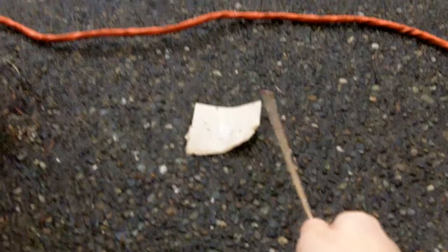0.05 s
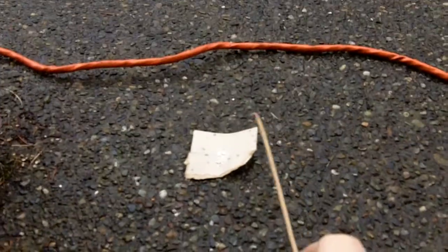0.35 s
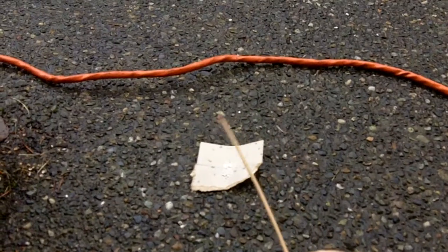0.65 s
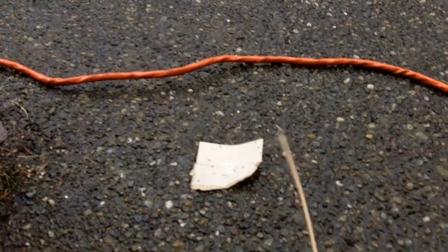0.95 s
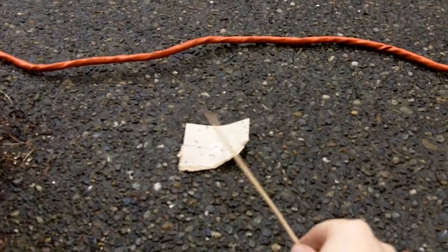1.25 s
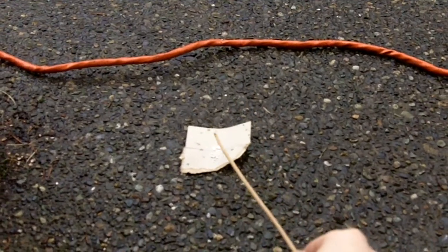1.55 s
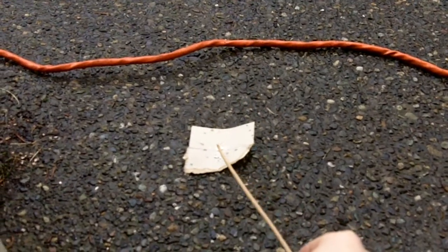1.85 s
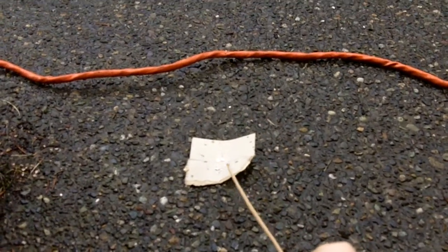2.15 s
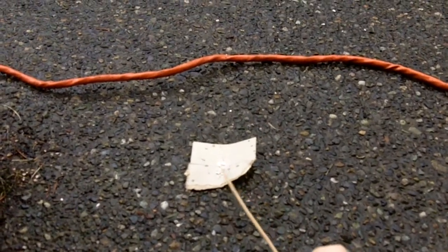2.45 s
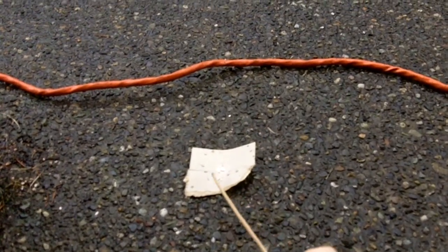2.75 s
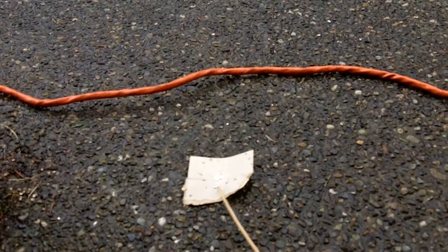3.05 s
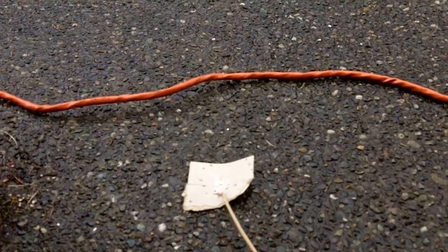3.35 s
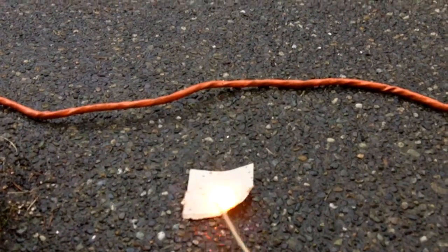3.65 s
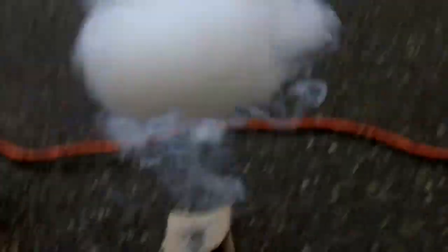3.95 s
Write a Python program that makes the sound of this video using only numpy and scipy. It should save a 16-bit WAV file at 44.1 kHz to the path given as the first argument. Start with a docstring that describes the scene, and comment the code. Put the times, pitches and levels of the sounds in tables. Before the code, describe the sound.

Flash powder ignites close by in one short, fizzing, roaring whoosh at about 3.7 seconds, gone by 3.9. From the start, a distant machine hums and buzzes steadily over outdoor air. Faint dry ticks fall between 0.6 and 3.1 seconds, with a soft low billow near 2.9. Tiny sizzles come around 3.4 and 3.6 seconds as grains catch. After the flare, the background hum is quieter.

```python
"""A machine hums and buzzes some way off, throbbing with its shaft over a wash of outdoor air.
Close by, a smouldering stick is put to a pinch of flash powder on a paper square on asphalt.
Faint dry ticks, a soft low billow, two small sizzles as grains catch; then the heap goes up in
one short whoosh of fizzing grains and roaring fireball. The mono microphone has a narrow notch,
and its gain control ducks the background after the flash."""
import sys
import numpy as np
from scipy import signal
from scipy.fft import rfft, irfft
from scipy.io import wavfile
from scipy.ndimage import uniform_filter1d

SR = 44100
rng = np.random.default_rng(int(sys.argv[2]) if len(sys.argv) > 2 else 0)


def materialize(psi):
    """Save the field psi as 16-bit PCM at rate SR to the path in sys.argv[1].

    A 1-D psi becomes a single channel; in a 2-D psi each row is a channel.
    """
    bounded = np.clip(np.atleast_2d(psi).T, -1, 1)
    quanta = np.round(bounded * 32767).astype(np.int16)
    wavfile.write(sys.argv[1], SR, quanta)


N = 176400
T = np.arange(N) / SR
HZ = np.fft.rfftfreq(N, 1 / SR)


def amp(db):
    """Decibels to gain."""
    return 10 ** (np.asarray(db) / 20)


def unit(x):
    """Scales to rms 1."""
    return x / np.sqrt(np.mean(x ** 2) + 1e-20)


def white():
    """White noise."""
    return rng.standard_normal(N)


def drift(hz):
    """Random motion at rms 1, rolling off above hz."""
    return unit(irfft(rfft(white()) * np.exp(-(HZ / hz) ** 2), N))


def band(hz, width_hz):
    """Noise in one resonance, at rms 1."""
    return unit(irfft(rfft(white()) / (1 + (2 * (HZ - hz) / width_hz) ** 2), N))


def tone(hz):
    """A slightly wavering sine at rms 1."""
    return unit(np.cos(2 * np.pi * (hz * T + rng.random()) + 0.3 * drift(4.8)))


def eq_db(points):
    """An EQ curve drawn through points on a log-frequency axis."""
    hz, db = np.transpose(points)
    return np.interp(np.log(HZ + 1), np.log(hz + 1), db)


def coloured(x, points):
    """Plays x through an EQ curve, at rms 1."""
    return unit(irfft(rfft(x) * amp(eq_db(points)), N))


def fader(points):
    """Gain along a dB curve, silent outside it."""
    times, db = np.transpose(points)
    return amp(np.interp(T, times, db, left=-200, right=-200))


def blip(start_s, decay_s, rise_s=0.0016):
    """Envelope with a quick rise and an exponential fall."""
    age = np.maximum(T - start_s, 0)
    return np.minimum(age / rise_s, 1) * np.exp(-np.clip((age - rise_s) / decay_s, 0, 20))


def swell(peak_s, width_s):
    """Bell-shaped envelope."""
    return np.exp(-((T - peak_s) / width_s) ** 2)


SHAFT_HZ, MAINS_BUZZ_HZ, SMEAR_TURNS = 41.4, 120, 0.1198
# Harmonics of the shaft rate: harmonic, relative_db
SHAFT_HARMONICS = [(1, -4.5), (2, -6.5), (3, 2), (4, -3), (5, -9), (6, -17), (7, -20.5)]


def shaft_hum(turns):
    """One stroke per shaft turn, smeared by phase lag in its wavering harmonics."""
    strokes = np.zeros(N)
    for k, db in SHAFT_HARMONICS:
        waver = 1 + .07 * drift(2.85)
        strokes += amp(db) * waver * np.cos(2 * np.pi * (k * turns - SMEAR_TURNS * k ** 2))
    return amp(-33) * unit(strokes)


# Overtones of the mains buzz rate: harmonic, level_db
MAINS_OVERTONES = [(2, -51.5), (4, -61), (5, -62), (8, -71.5)]


def mains_hum(beat_peak_s=2.87):
    """Electrical hum that beats against the third shaft harmonic."""
    in_step_phase = (3 * SHAFT_HZ - MAINS_BUZZ_HZ) * beat_peak_s - SMEAR_TURNS * 3 ** 2
    fundamental = amp(-47.5) * unit(np.cos(2 * np.pi * (MAINS_BUZZ_HZ * T + in_step_phase)))
    return fundamental + sum(amp(db) * tone(k * MAINS_BUZZ_HZ) for k, db in MAINS_OVERTONES)


# The machine's whines: pitch_hz, level_db
WHINE_TONES = [(410, -57.5), (641, -66.5), (1172, -63.5), (1230, -72.5)]


def whines():
    """Faint steady tones riding above the hum."""
    return sum(amp(db) * tone(hz) for hz, db in WHINE_TONES)


# Resonances that buzz with the mains: centre_hz, width_hz, level_db
BUZZ_BANDS = [(4463, 160, -64.5), (9250, 430, -85.5), (11000, 610, -83.5)]


def buzz(turns):
    """A thin, fluttering buzz: resonances pulse with the mains and throb with the shaft."""
    pulse = 0.245 * np.cos(2 * np.pi * MAINS_BUZZ_HZ * T)
    throb = .45 * np.cos(2 * np.pi * turns)
    flutter = 0.37 * drift(43)
    gate = np.exp(pulse + throb + flutter)
    return sum(amp(db) * unit(gate * band(hz, width)) for hz, width, db in BUZZ_BANDS)


# Dark outdoor bed: frequency_hz, gain_db
AIR_EQ = [(15, 6), (60, -2), (150, -1), (240, -1.5), (340, -5.5), (400, -10), (470, -7.5), (550, -15),
          (850, -14), (1020, -18.5), (1170, -13.5), (1500, -14.5), (2000, -26.5), (2600, -22.5),
          (3050, -30.5), (4200, -29.5), (5000, -34), (6100, -35), (8000, -49.5), (9400, -50), (12000, -57),
          (15000, -63)]


def air(patch_depth_db=0.97):
    """Fan wash and distant rumble, in drifting patches, throbbing with the shaft."""
    spectrogram = signal.stft(white(), nperseg=512, noverlap=384)[2]
    patches = uniform_filter1d(rng.standard_normal(spectrogram.shape), size=8, axis=0)  # across pitch
    patches = unit(uniform_filter1d(patches, size=20, axis=1))  # across time
    wash = signal.istft(spectrogram * amp(patch_depth_db * patches), nperseg=512, noverlap=384)[1][:N]
    throb = 1 + 0.088 * np.cos(2 * np.pi * SHAFT_HZ * T)
    return amp(-37) * coloured(wash * throb, AIR_EQ)


# Faint dry ticks: start_s, level_db, treble_tilt_db_per_octave
TICK_CUES = [(.6045, -28, -1), (.6075, -31, -1), (.93, -31, -2), (1.1728, -26, -1), (2.5358, -31, 2),
             (3.0818, -28, 0), (3.309, -45, 6)]
# Their dull body: frequency_hz, gain_db
TICK_EQ = [(200, -6), (700, 3.5), (1500, -1), (2100, -3.5), (3200, -13), (4400, -11), (7000, -24),
           (14000, -50)]


def ticks():
    """Small ticks close by, each one knock and a little scatter, ringing briefly."""
    out = np.zeros(N)
    for start_s, db, tilt in TICK_CUES:
        knock = np.arange(N) == round(start_s * SR)
        scatter = .06 * blip(start_s, decay_s=0.0037) * white()
        log_gain = np.log(amp(eq_db(TICK_EQ) + tilt * np.log2(np.maximum(HZ, 500))))
        mirrored = np.r_[log_gain, log_gain[-2:0:-1]]
        body = np.exp(signal.hilbert(mirrored).conj())[:len(HZ)]  # minimum phase: no pre-ring
        out += amp(db) * irfft(rfft(knock + scatter) * body, N) / abs(irfft(body, N)).max()
    return out


def billow():
    """A soft low rumble swells and is gone, well ahead of the flash."""
    return amp(-36.5) * swell(peak_s=2.9, width_s=0.026) * drift(hz=150)


# Grains of powder catching: start_s, level_db, decay_s
SPIT_CUES = [(3.42, -57, .003), (3.432, -46, 0.0044), (3.438, -54, .004), (3.445, -44, 0.0045),
             (3.562, -56, .006), (3.574, -56, .004), (3.5838, -45.5, .004), (3.689, -51, .006),
             (3.705, -55, .004), (3.884, -49, .002), (3.916, -51, .003)]
# Their bright sizzle: frequency_hz, gain_db
SPIT_EQ = [(1000, -11), (3500, 3.5), (6500, 5.5), (9500, -11), (13000, -15), (15000, -21)]


def spits():
    """Single grains flare with a tiny hiss."""
    flares = sum(amp(db) * blip(start_s, decay_s) for start_s, db, decay_s in SPIT_CUES)
    return flares * coloured(white(), SPIT_EQ)


# Rise and fall of the fizz: time_s, level_db
FIZZ_FADER = [(3.69, -66), (3.722, -41), (3.75, -38), (3.775, -32), (3.805, -29.5), (3.826, -38),
              (3.868, -55), (3.92, -69)]
# Its sharp top end: frequency_hz, gain_db
FIZZ_EQ = [(1500, -9), (3500, -8.5), (4800, -2), (6300, 8), (7300, -3), (8600, -6.5), (9200, -9),
           (10000, -14), (12500, -11), (15000, -22)]


def fizz(grains_per_s=5000, crackle_share=0.28):
    """The heap's grains burn in a rush, a fine crackle blended with smooth hiss."""
    crackle = unit(white() * (rng.random(N) < grains_per_s / SR))
    blend = np.sqrt(crackle_share) * crackle + np.sqrt(1 - crackle_share) * white()
    return fader(FIZZ_FADER) * coloured(blend, FIZZ_EQ)


# Rise and fall of the fireball: time_s, level_db
ROAR_FADER = [(3.69, -69), (3.725, -39), (3.76, -33), (3.772, -24.5), (3.8, -26), (3.826, -31.5),
              (3.865, -45), (3.92, -71)]
# Its full midrange: frequency_hz, gain_db
ROAR_EQ = [(60, -10), (250, -8), (370, 2.5), (520, -5), (680, 0), (850, 0), (1100, -0.5), (1300, -7.5),
           (1500, -1.5), (2100, -3), (2420, -1.5), (3100, -10.5), (3800, -11), (4300, -3), (5200, -10.5),
           (8000, -28), (15000, -40)]
# Narrow resonances in the roar: centre_hz, width_hz, relative_db
ROAR_BANDS = [(1013, 45, -14), (1143, 45, -10), (1462, 35, -11), (1765, 45, -16), (2350, 110, -11),
              (2535, 45, -15)]


def roar():
    """The fireball roars: one burst of broad noise with a ringing edge."""
    rings = sum(amp(db) * band(hz, width) for hz, width, db in ROAR_BANDS)
    return fader(ROAR_FADER) * unit(coloured(white(), ROAR_EQ) + rings)


def gas_push(centre_s=3.7705, width_s=.0008):
    """Expanding gas gives one pressure pulse as the whole heap catches."""
    offset = (T - centre_s) / width_s
    return amp(-17) * offset * np.exp(1 - abs(offset))


def last_hiss():
    """The last of the powder hisses out."""
    return amp(-48) * swell(peak_s=3.845, width_s=0.036) * band(4280, width_hz=520)


def outdoor_tail(x, t60_s=0.42, predelay_s=.012):
    """A short, weak outdoor reverb."""
    t = T[:SR // 2]
    tail = rng.standard_normal(len(t)) * amp(-60 * t / t60_s) * (t > predelay_s)
    return amp(-20) * signal.fftconvolve(x, tail / np.linalg.norm(tail))[:N]


def scene():
    """A mono mix: machine, air and ticks stay dry; the powder and the billow get a tail."""
    bursts = fizz() + roar() + last_hiss() + gas_push() + billow() + spits()
    turns = SHAFT_HZ * T + 0.0019 * drift(3)
    machine = shaft_hum(turns) + mains_hum() + whines() + buzz(turns)
    mono = machine + air() + ticks() + bursts + outdoor_tail(bursts)
    return np.array([mono, mono])


def gain_control(x, threshold_db=-33, slope=.55, attack_s=.02, recovery_db_per_s=6):
    """Gain that ducks quickly on loud sound above 400 Hz and creeps back up."""
    sidechain = irfft(rfft(x) * (HZ > 400), N)
    power_db = 10 * np.log10(abs(uniform_filter1d(sidechain ** 2, size=512)) + 1e-12)
    recovery_db = T * recovery_db_per_s
    held_db = np.maximum.accumulate(power_db + recovery_db) - recovery_db
    over_db = np.maximum(held_db - threshold_db, 0)
    pole = np.exp(-1 / (attack_s * SR))
    return amp(-slope * signal.lfilter([1 - pole], [1, -pole], over_db))


NOTCH_HZ, NOTCH_WIDTH_HZ, CUTOFF_HZ = 5436, 870, 15100
CUT_IN_S, FADE_IN_S = 0.11, .005


def record(dry):
    """The microphone chain: narrow notch, gain control, a quick fade-in and a steep high cut."""
    detune = (HZ - NOTCH_HZ) / NOTCH_WIDTH_HZ
    notched = irfft(rfft(dry) * 1j * detune / (1 + 1j * detune), N)
    fade_in = np.clip((T - CUT_IN_S) / FADE_IN_S, 0, 1)
    high_cut = signal.firwin(401, CUTOFF_HZ, window=("kaiser", 9), fs=SR)
    return signal.oaconvolve(notched * gain_control(notched[0]) * fade_in, high_cut[None], "same")


dry = scene()
out = record(dry)
materialize(out)
```